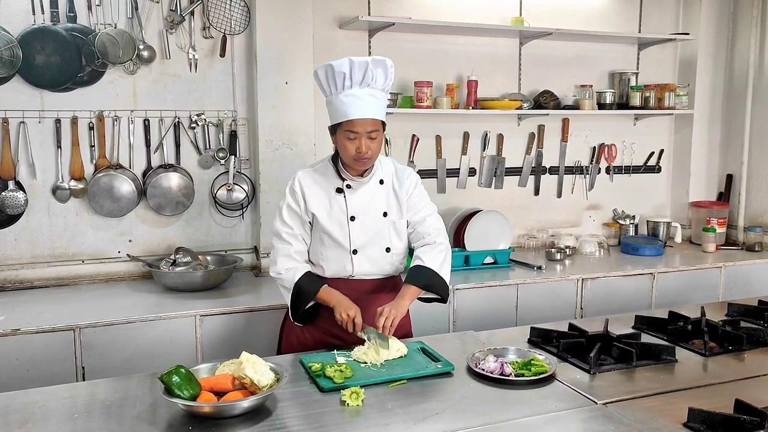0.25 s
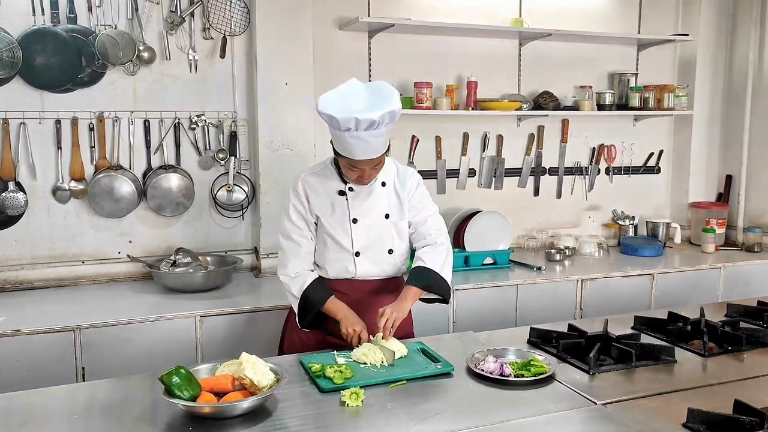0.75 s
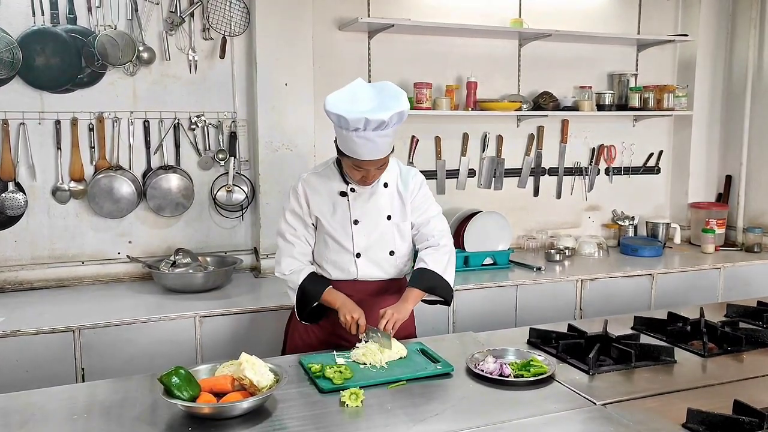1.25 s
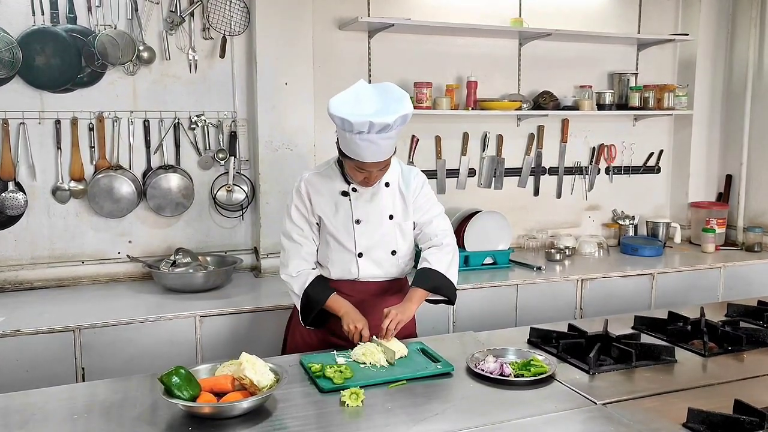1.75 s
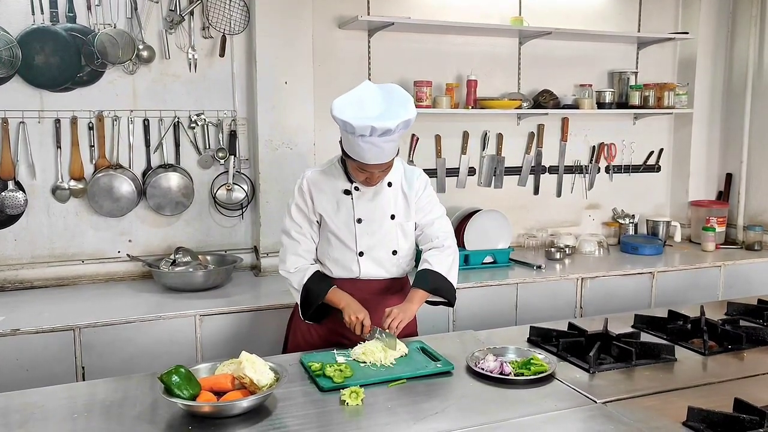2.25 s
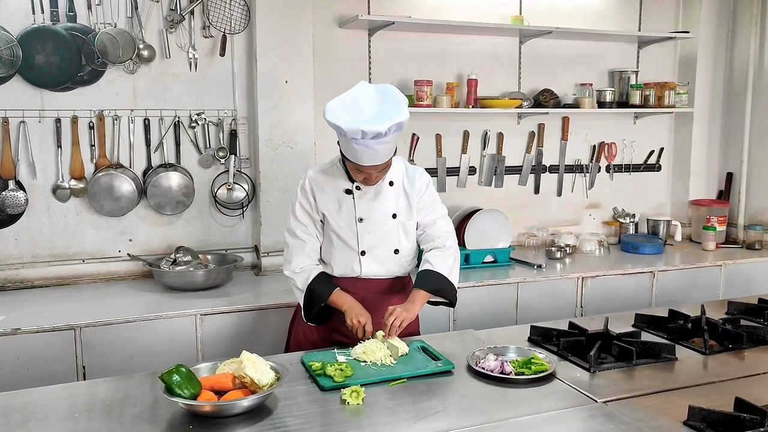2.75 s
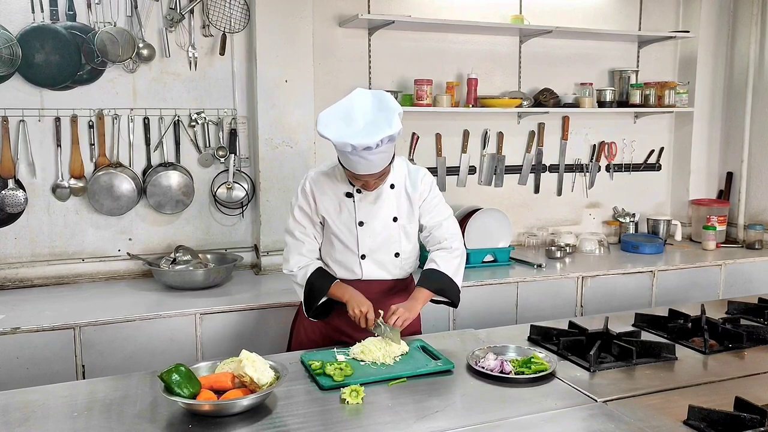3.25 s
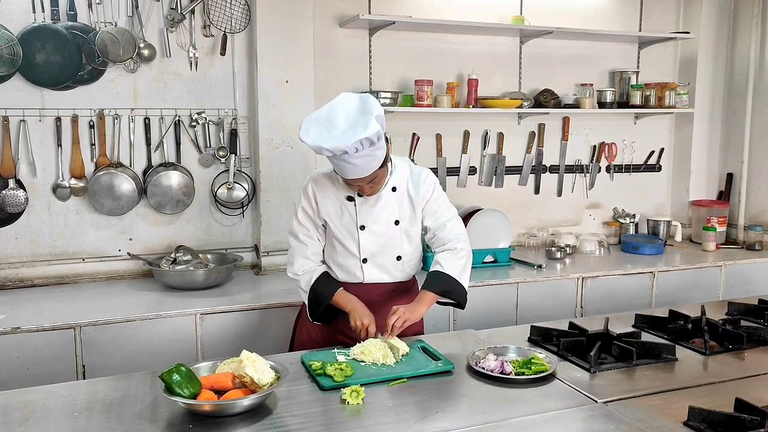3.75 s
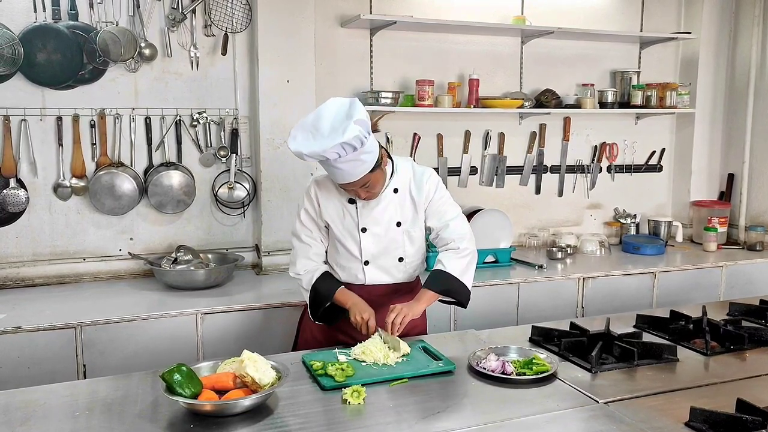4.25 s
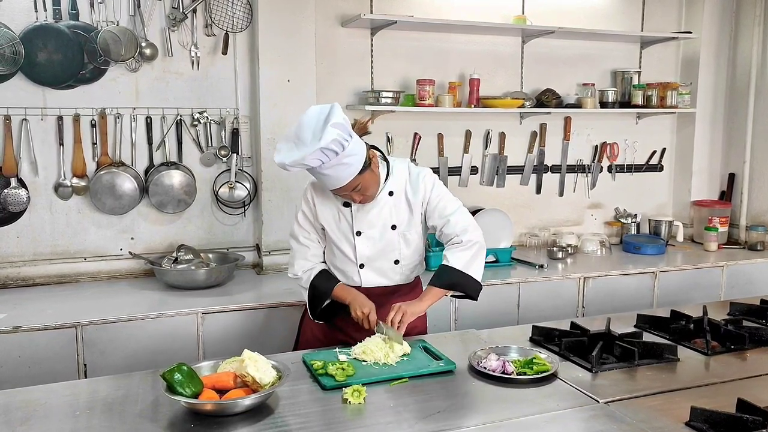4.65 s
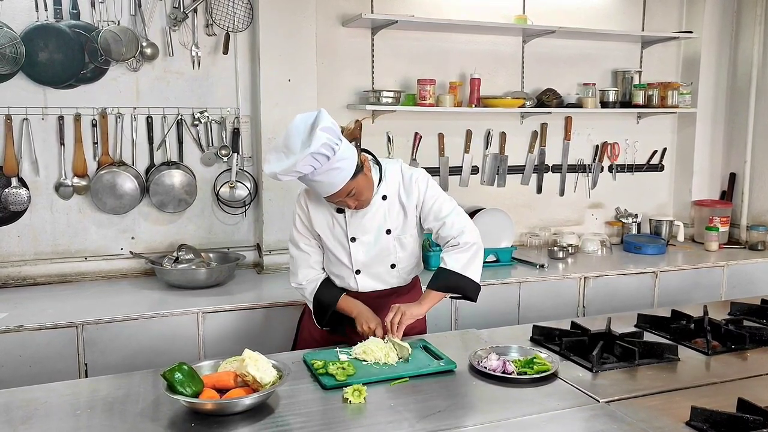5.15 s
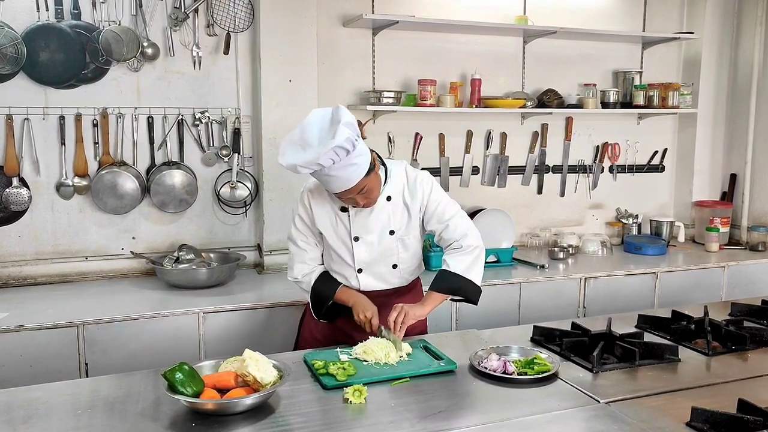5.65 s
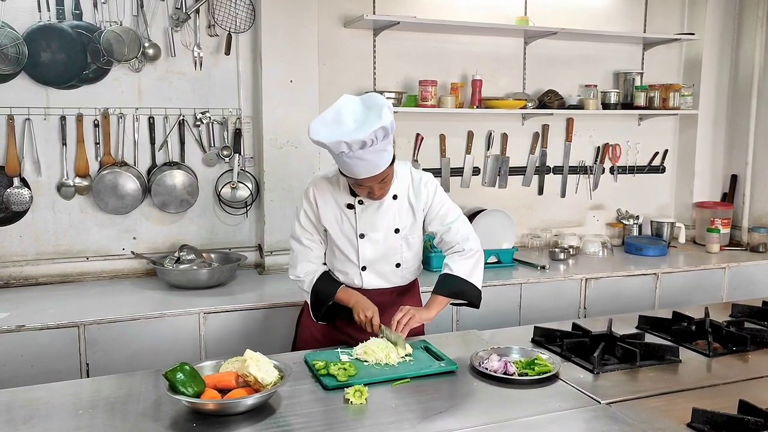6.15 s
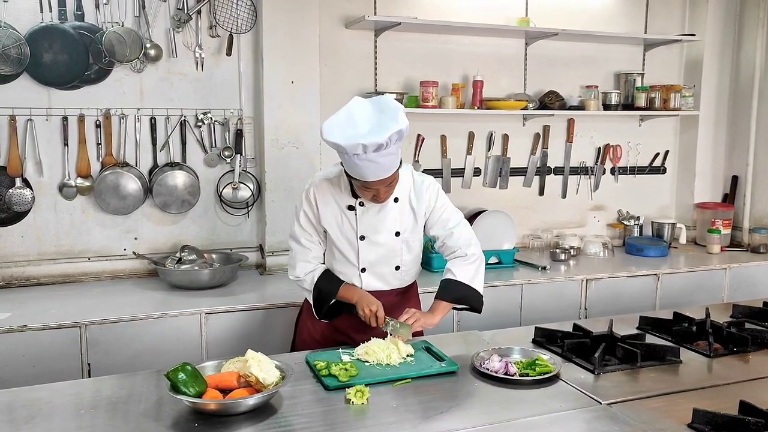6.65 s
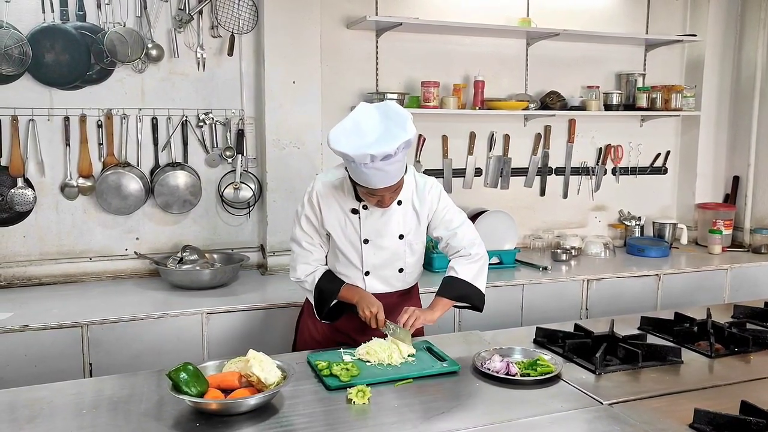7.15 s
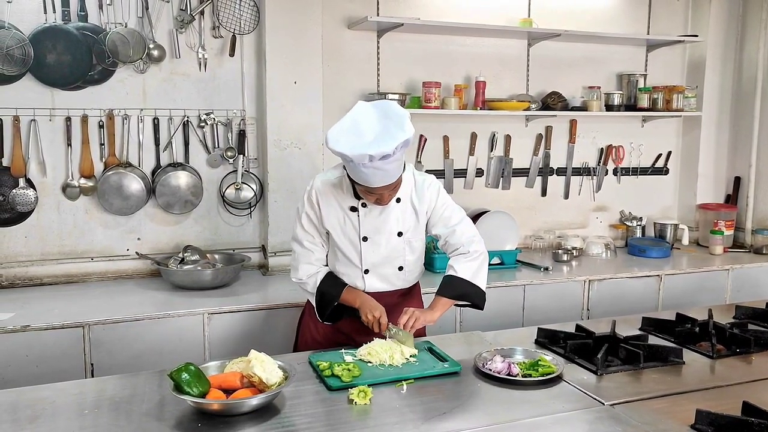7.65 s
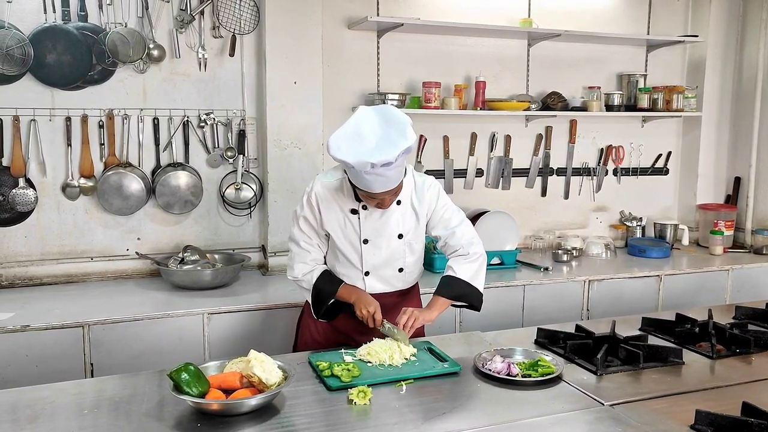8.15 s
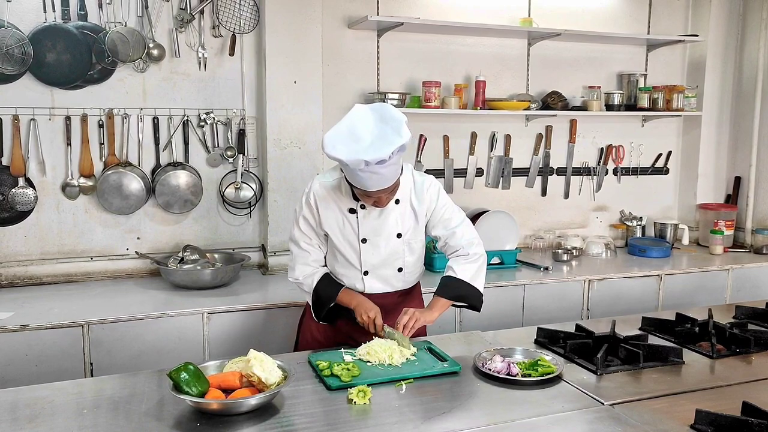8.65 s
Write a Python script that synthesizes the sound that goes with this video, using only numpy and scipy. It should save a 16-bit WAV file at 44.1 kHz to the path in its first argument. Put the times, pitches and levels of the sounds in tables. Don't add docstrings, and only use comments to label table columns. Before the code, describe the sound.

In a hard-walled kitchen a knife shreds cabbage on a plastic board over a steel counter. About three strokes a second, each a crisp leafy crunch usually ending in a hollow knock with uneven force. Near six and a half seconds the chopping pauses, shreds snap and an engine idles low outside, then slower cuts resume. A camera microphone at some distance, with faint rumble beneath.

```python
import sys
import numpy as np
from scipy import signal
from scipy.fft import rfft, irfft, next_fast_len
from scipy.io import wavfile
from scipy.ndimage import uniform_filter1d, map_coordinates

SR = 44100
rng = np.random.default_rng(int(sys.argv[2]) if len(sys.argv) > 2 else 0)


def how_loud(loudness_db):
    steps = np.asarray(loudness_db, float) / 20
    return 10 ** steps


def store_wav(level_fs):
    pcm = np.round(np.clip(np.atleast_2d(level_fs), -1, 1) * 32767)
    wavfile.write(sys.argv[1], SR, pcm.T.astype(np.int16))


N = 392931


def unit(x):
    return x / np.sqrt(np.mean(x ** 2) + 1e-20)


def along(points, hz):
    f, v = np.transpose(points)
    return np.interp(np.log(hz + 1), np.log(f + 1), v)


def curves(rows):
    s, *cols = np.transpose(rows)
    return [np.interp(np.arange(N) / SR, s, c) for c in cols]


def wobble(rate):
    knots = rng.standard_normal(int(N * rate / SR) + 4)
    return map_coordinates(knots, [np.arange(N) * rate / SR])


def coloured(x, points):
    m = next_fast_len(len(x) + 8192)
    gain = how_loud(along(points, np.fft.rfftfreq(m, 1 / SR)))
    return irfft(rfft(x, m) * gain, m)[:len(x)]


def add(track, s, x):
    start = round(s * SR)
    part = x[max(-start, 0):][:len(track) - max(start, 0)]
    track[max(start, 0):][:len(part)] += part


# (t/s, level/dB)
HUM_LEVEL = [
    (0.0, -58),
    (0.87, -57.5),
    (1.17, -55),
    (4.17, -54),
    (4.34, -55),
    (6.58, -54),
    (6.75, -58),
    (7.27, -57.5),
    (7.64, -51.5),
    (8.91, -58.5),
]
# (f/Hz, level/dB per Hz)
DEEP_SPECTRUM = [(8.8, -30), (15, 0.5), (32, -1), (48, -5.5), (60, -15.5), (70, -29), (90, -18), (120, -45),
                 (200, -120)]
HUM_SPECTRUM = [(35, -29.5), (60, -2), (91, -2.5), (167, -6), (210, -6.5), (400, -26.5), (520, -49),
                (880, -120)]
# (t/s, f/Hz, level/dB, octave level/dB)
ENGINE = [
    (3.9, 43.3, -70, -76),
    (4.45, 43.46, -64, -52),
    (4.9, 43.5, -68, -64),
    (5.5, 43.16, -60, -63),
    (6.2, 43, -55, -59),
    (6.55, 42.1, -41, -59),
    (7.0, 44.94, -41, -62),
    (7.3, 41.9, -46, -68),
    (7.6, 41.1, -75, -68.5),
]
# (f/Hz, level/dB per Hz)
AIR_SPECTRUM = [(150, -10.5), (250, 7.5), (579, 3.5), (3500, -13), (4440, -27.5), (6050, -20.5),
                (8380, -66), (10500, -66), (13100, -55.5), (15000, -42.5)]
DEEP_DB, AIR_DB = -47.5, -64.5


def background():
    hum_db, = curves(HUM_LEVEL)
    engine_hz, engine_db, octave_db = curves(ENGINE)
    noise = lambda spectrum: unit(coloured(rng.standard_normal(N), spectrum))
    phase = 2 * np.pi * np.cumsum(engine_hz + 0.5 * wobble(5.7)) / SR
    engine = how_loud(engine_db + 1.2 * wobble(6)) * np.sin(phase)
    engine += how_loud(octave_db + 1.5 * wobble(5.6)) * np.sin(2 * phase)
    deep = how_loud(DEEP_DB + 1.5 * wobble(2.8)) * noise(DEEP_SPECTRUM)
    hum = how_loud(hum_db + 2.0 + 0.7 * wobble(3.3)) * noise(HUM_SPECTRUM)
    air = how_loud(AIR_DB + 1.0 + 0.54 * wobble(3.6)) * noise(AIR_SPECTRUM)
    return deep + engine + hum + air


# (f/Hz, t60/s)
REVERB_TIME = [(150, 0.95), (400, 1), (1000, 0.76), (2700, 0.65), (7000, 0.48), (14000, 0.56)]
# (f/Hz, level/dB)
WALL_COLOUR = [(100, 16), (400, -0.5), (1000, -2), (2500, -1), (6000, 7.5), (14000, -11)]


def room_answer():
    hz, t, z = signal.stft(rng.standard_normal(SR), SR, nperseg=256)
    decay_db = along(WALL_COLOUR, hz)[:, None] - 60 * t / along(REVERB_TIME, hz)[:, None]
    answer = signal.istft(z * how_loud(decay_db), SR, nperseg=256)[1]
    answer = answer * (1 - np.exp(-(np.arange(len(answer)) / SR / 0.0011) ** 2))
    return answer / np.linalg.norm(answer)


def tearing(spectrum, rate, spread_db, hiss, patchy_db):
    size = np.minimum(rng.exponential(size=N), 3)
    bursts = (rng.random(N) < rate / SR) * how_loud(spread_db * size) * rng.standard_normal(N)
    z = signal.stft(unit(bursts) + hiss * rng.standard_normal(N), nperseg=256)[2]
    field = uniform_filter1d(rng.standard_normal(z.shape), size=9, axis=0)
    field = uniform_filter1d(field, size=7, axis=1)
    patchy = signal.istft(z * how_loud(patchy_db * unit(field)), nperseg=256)[1][:N]
    return unit(coloured(patchy, spectrum))


# (bite t/s, cut length/s, level at the end/dB, swell during the cut/dB)
CUTS = [(0.133, 0.046, -55.5, 9), (0.408, 0.1, -56.5, 5), (.705, 0.09, -52, 13.5), (1.025, 0.09, -54.5, 8),
        (1.332, .11, -55, 4.5), (1.66, 0.086, -56, 8.5), (1.978, 0.1, -54, 10.5),
        (2.306, 0.089, -51.5, 10.5), (2.63, 0.095, -51.5, 13.5), (2.957, 0.076, -52.5, 10.5),
        (3.369, .11, -53.5, 10), (3.767, 0.11, -56.5, 8.5), (4.1, 0.091, -52.5, 13.5),
        (4.437, 0.094, -53.5, 11), (4.81, 0.033, -59, 6), (5.108, 0.092, -52.5, 7.5),
        (5.35, 0.039, -67, 13), (5.439, 0.065, -50, 9), (5.735, 0.029, -56.5, 14.5),
        (6.034, 0.038, -59, 6.5), (6.342, 0.11, -53, 13), (6.784, 0.039, -72.5, 2), (7.313, 0.13, -52, 21),
        (7.674, 0.13, -51, 16.5), (8.013, .025, -76.5, -0.5), (8.155, 0.08, -76.5, -0.5),
        (8.36, 0.051, -58.5, 13.5), (8.801, 0.053, -64.5, 14)]
BITE_S, BITE_DB = 0.01, 14
FEED_S, FEED_DB = 0.07, 10
RUSTLE_DB = -84


def stroke_gain(swell_share, settle_db_per_s):
    t, power = np.arange(N) / SR, np.full(N, how_loud(RUSTLE_DB) ** 2)
    for s, length, db, swell_db in CUTS:
        entry_db = db - swell_share * swell_db
        times = [-BITE_S - FEED_S, -BITE_S, 0, length, length + 1]
        levels = [entry_db - BITE_DB - FEED_DB, entry_db - BITE_DB, entry_db, db, db - settle_db_per_s]
        power += how_loud(2 * np.interp(t - s, times, levels, -200, -200))
    return np.sqrt(power)


# (f/Hz, level/dB per Hz)
LEAF_SPECTRUM = [(1760, -54), (3000, -2.5), (4170, -0.5), (5180, -1.5), (6870, -5.5), (13100, -7),
                 (14600, -12), (15000, -47.5)]
# (f/Hz, level/dB per Hz)
RIB_SPECTRUM = [(250, -23.5), (500, 3), (800, -3.5), (1500, -7), (2500, -10.5), (4000, -22.5),
                (6000, -30.5)]
# (t/s, peak level/dB, f/Hz)
SHRED_SNAPS = [(0.684, -45, 9900), (0.768, -44.5, 5940), (0.817, -40.5, 4800), (1.044, -41, 5150),
               (1.2945, -51, 9700), (1.678, -37.5, 4740), (2.9216, -48, 3800), (3.19, -53, 6000),
               (3.308, -55, 8560), (3.7369, -50, 4320), (4.4019, -52, 3730), (5.9798, -53, 4470),
               (6.2875, -45, 3960), (6.3644, -40.5, 4770), (6.3884, -56, 5460), (6.68, -45.5, 3760),
               (6.7415, -47, 3920), (6.785, -44, 4270), (6.795, -42, 4930), (6.8083, -38, 4130),
               (6.832, -46, 4470), (6.9719, -60.5, 6150), (7.0075, -56, 3647), (7.2429, -67, 3660),
               (7.3552, -48, 3990), (7.4065, -36.5, 5470), (7.734, -42.5, 5500)]
LEAF_SETTLE_DB_PER_S = 260
RIBS_DB, RIBS_SETTLE_DB_PER_S, RIBS_SWELL = 5.5, 157, 1.15
SKIN_DB, SKIN_HZ, SNAP_T60_S = 11.5, 5300, 0.018


def crunch(jerk_db):
    leaves = stroke_gain(1, LEAF_SETTLE_DB_PER_S) * tearing(
        LEAF_SPECTRUM, rate=2300, spread_db=0.5, hiss=0.34, patchy_db=2.5)
    ribs = how_loud(RIBS_DB) * stroke_gain(RIBS_SWELL, RIBS_SETTLE_DB_PER_S) * tearing(
        RIB_SPECTRUM, rate=800, spread_db=1.0, hiss=1.0, patchy_db=3)
    out = how_loud(2.0 + jerk_db) * (leaves + ribs)
    t = np.arange(SR // 20) / SR
    skins = [(s, db - swell_db + SKIN_DB, SKIN_HZ * np.exp(0.4 * rng.standard_normal()))
             for s, _, db, swell_db in CUTS]
    for s, db, hz in skins + list(SHRED_SNAPS):
        noise = rng.standard_normal(len(t))
        peak = signal.lfilter(*signal.iirpeak(hz, 2.5, SR), noise)
        snap = unit(peak) + 0.29 * np.diff(noise, prepend=0)
        add(out, s, how_loud(db - 6.5 - 60 * t / SNAP_T60_S) * snap)
    return out + how_loud(-8.5) * signal.fftconvolve(out, room_answer())[:N]


def ring(modes, t):
    return sum(how_loud(db) * np.sin(2 * np.pi * hz * t) * np.exp(-np.pi * width * t) for hz, width, db in modes)


# (f/Hz, level/dB, t60/s)
ROOM_MODES = [(62.2, 6.5, .26), (184, -4, 0.64), (338.5, -6, 0.51), (385.3, 6, 0.44), (423.7, 3.5, .5),
              (490.4, -3, 0.45), (504.5, 8, 0.36), (552, -3.5, 0.55), (591, -8, .6), (638.4, 1.5, 0.42),
              (689, -2.5, 0.92), (759, -9, 0.72), (807, -6, .6), (928, -3, 0.57)]


def standing_waves(t):
    drift = np.cumsum(rng.standard_normal((len(ROOM_MODES), SR)), axis=1) * 0.0089
    waves = sum(how_loud(level - 60 * t / t60) * np.sin(2 * np.pi * hz * t + phase)
                for (hz, level, t60), phase in zip(ROOM_MODES, drift))
    return waves * (1 - np.exp(-t / 0.01))


# (deepest swing t/s, peak/dB, second mode/dB, upper modes/dB, crack/dB)
IMPACTS = [(0.1797, -11, -28, -4, -27.5), (0.8183, -22.5, -23, -14.5, -11),
           (1.1168, -8, -21.5, -2.5, -30.5), (1.6825, -38, -25, -29, -1), (1.7428, -12.5, -7.5, -11, -45),
           (2.0851, -23.5, -22, -6, -32), (2.4156, -25, -24, -23, -20), (2.7415, -17.5, -5.5, -41, -40),
           (3.0377, -11, -12.5, -3.5, -35.5), (3.4799, -12, -13, 2.5, -24.5),
           (3.8581, -7.5, -16.5, -0.5, -25.5), (4.2191, -22.5, -41, -16, -34),
           (4.5469, -25.5, -21.5, -10, -33.5), (4.846, -13.5, -0.5, -9.5, -33),
           (5.2246, -21, -16, -14, -32), (5.5037, -37.5, -2.5, 5, -21), (5.5265, -20, -4.5, -31, -17.5),
           (5.7735, -16, -3.5, -35.5, -46), (6.072, -11, -1, -11, -51.5), (6.454, -7.5, -11.5, -0.5, -44.5),
           (7.4527, -8.5, -41, -3, -25.5), (7.8114, -34, -15, -15, -30), (8.4121, -14, -3.5, -34.5, -29),
           (8.8544, -18, 0.5, -39, -58)]
# (peak/dB, second mode/dB, upper modes/dB, crack/dB)
EARLIER_IMPACT = (-3, -24, -3, -24)
# (f/Hz, width/Hz, level/dB)
BENDING_MODES = [(659, 271, 2.5), (554, 120, -14)]
# (f/Hz, width/Hz, level/dB)
SECOND_MODES = [(1477, 530, 2), (1010, 3400, -13.5)]
# (f/Hz, width/Hz, level/dB)
UPPER_MODES = [(2083, 530, -1.5), (1755, 420, -5), (3500, 920, -9)]
# (delay t/s, level/dB)
REFLECTIONS = [
    (.0046, -16.5),
    (.0062, -25.5),
    (0.0095, -23.5),
]
EARLIER_S = -0.16
SWING_S = 0.0011
ROOM_DB, SPRAY_DB = -8.5, -13


def knocks():
    out, t = np.zeros(N), np.arange(SR) / SR
    short = t[:SR // 40]
    push = np.pad(np.hanning(14), (22, 0)) / 6.5
    growth = 1 - np.exp(-(short / 0.0006) ** 2)
    reflections = np.zeros(len(short))
    reflections[0] = 1
    for delay, db in REFLECTIONS:
        add(reflections, delay, how_loud([db]))
    small_source = signal.butter(2, 290, "high", fs=SR)
    soft = signal.butter(2, 2000, "low", fs=SR)
    firm = signal.butter(2, 3200, "low", fs=SR)
    edges = signal.butter(2, [2400, 4000], "band", fs=SR)
    dip = signal.iirnotch(2880, 6, SR)
    dull = signal.butter(1, 5000, "low", fs=SR)
    same_room = room_answer()
    for s, db, second_db, upper_db, crack_db in [(EARLIER_S, *EARLIER_IMPACT)] + list(IMPACTS):
        second = how_loud(second_db + 5.5) * signal.lfilter(*firm, ring(SECOND_MODES, short))
        upper = how_loud(upper_db + 4.5) * ring(UPPER_MODES, short)
        higher = signal.lfilter(push, 1, [second, upper])
        bending = signal.lfilter(*soft, growth * ring(BENDING_MODES, short))
        parts = signal.lfilter(*small_source, np.vstack([bending, higher]))
        modes = signal.lfilter(*dip, parts.sum(axis=0))
        crack = signal.lfilter(*dull, np.diff(rng.standard_normal(len(short) + 1)))
        crack = crack * how_loud(crack_db - 1.5 - 60 * short / 0.008)
        spray = signal.lfilter(*edges, rng.standard_normal(len(short))) * how_loud(-60 * short / 0.0073)
        spray *= how_loud(SPRAY_DB) * (how_loud(upper_db) + 0.3 * how_loud(second_db))

        start = s - SWING_S
        direct = np.convolve(modes, reflections) + np.pad(growth * crack, (0, len(short) - 1))
        add(out, start, how_loud(db + 5) * direct)
        add(out, start, how_loud(db - 28.5) * standing_waves(t))
        sources = [*parts, how_loud(6) * crack + spray]
        bending_room = how_loud(-1.5) * same_room + how_loud(-1) * room_answer()
        rooms = [bending_room, room_answer(), room_answer(), room_answer()]
        reverb = sum(signal.fftconvolve(source, room) for source, room in zip(sources, rooms))
        add(out, start, how_loud(db + 6.5 + ROOM_DB) * reverb)
    return out


# (f/Hz, side minus mid level/dB)
STEREO_WIDTH = [(3500, -52.5), (4500, -24.5), (6000, -10), (9000, -4), (14000, -5.5)]


def scene():
    jerk_db = 0.93 * wobble(35) + 1.4 * wobble(90)
    mid = knocks() + crunch(jerk_db) + background()
    side = coloured(crunch(jerk_db) + background(), STEREO_WIDTH)
    return np.array([mid + side, mid - side])


def band_limit(x):
    return signal.sosfilt(signal.butter(12, 15170, fs=SR, output="sos"), x)


# (f/Hz, level/dB)
MIC_RESPONSE = [(14000, -1), (14350, -7), (14600, -40), (16000, -78.5)]


def record(dry):
    soft = dry / (1 + np.abs(dry / 1.3) ** 4) ** (1 / 4)
    mix = np.array([coloured(x, MIC_RESPONSE) for x in soft])
    return band_limit(mix)


dry = scene()
out = record(dry)
store_wav(out)
```